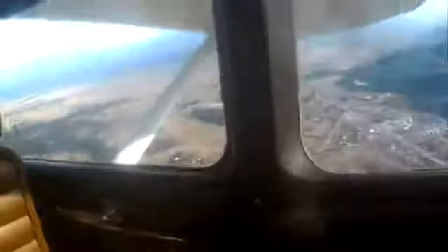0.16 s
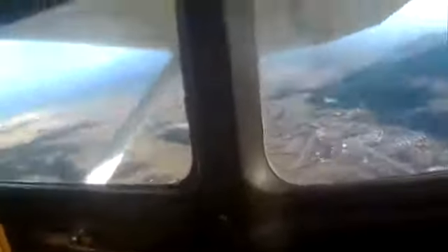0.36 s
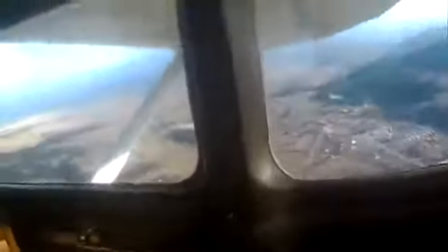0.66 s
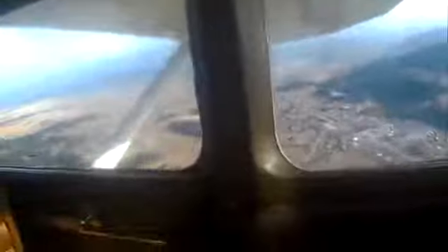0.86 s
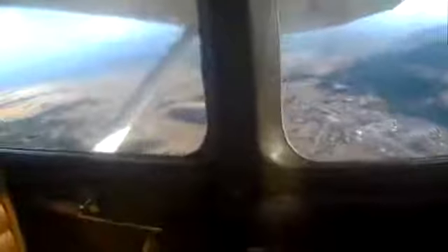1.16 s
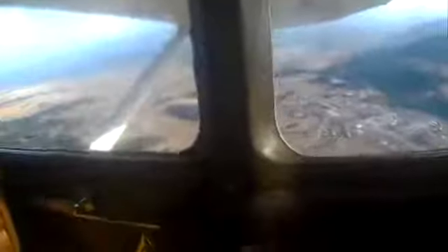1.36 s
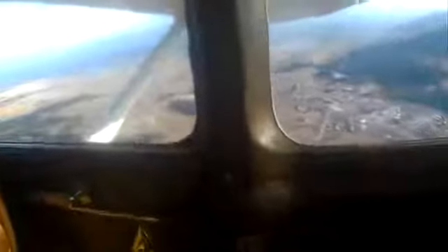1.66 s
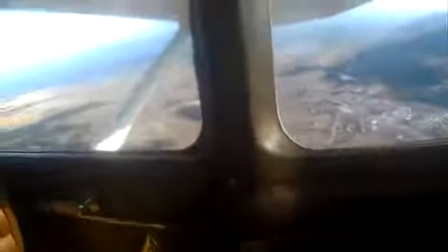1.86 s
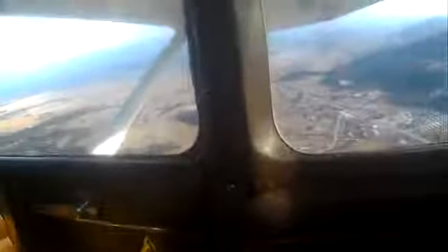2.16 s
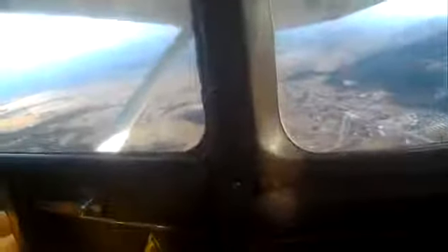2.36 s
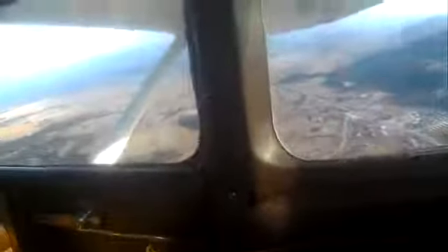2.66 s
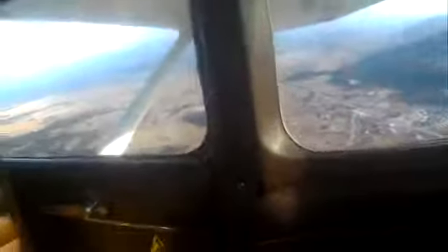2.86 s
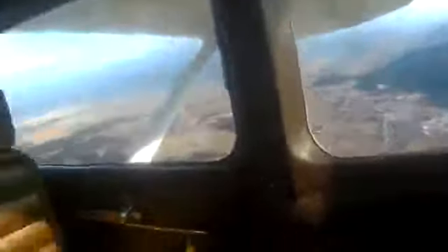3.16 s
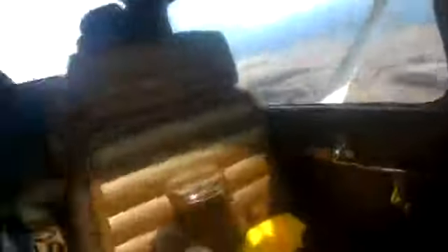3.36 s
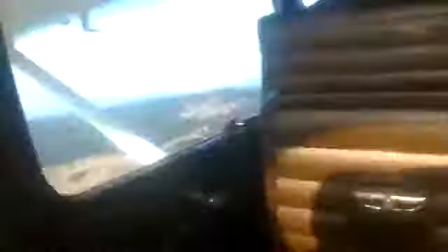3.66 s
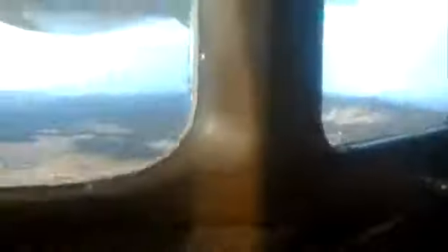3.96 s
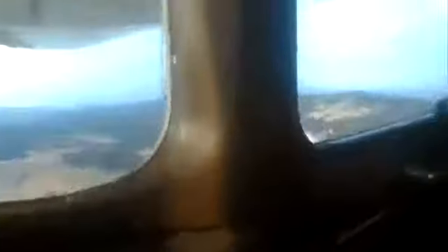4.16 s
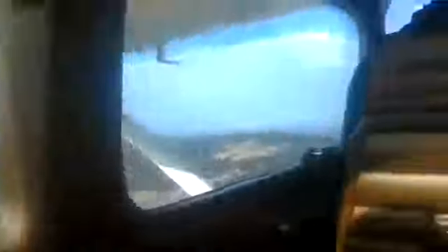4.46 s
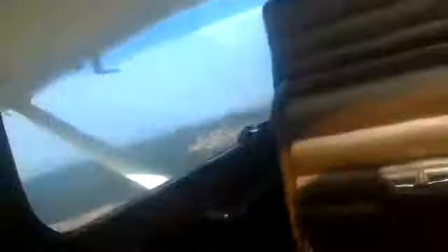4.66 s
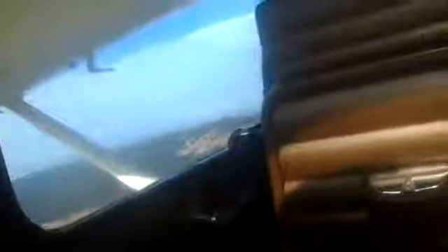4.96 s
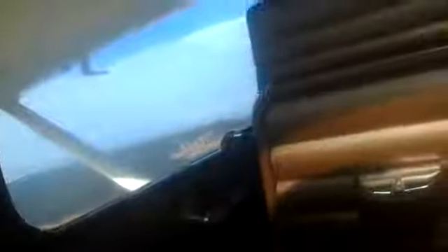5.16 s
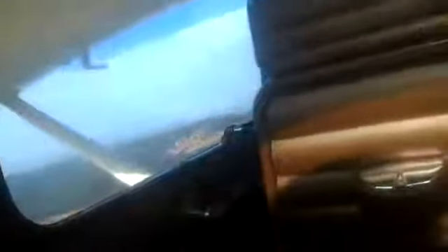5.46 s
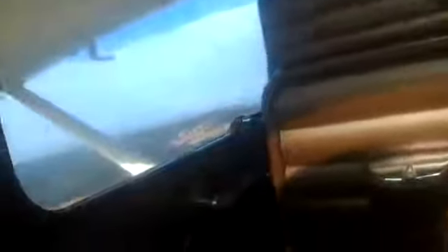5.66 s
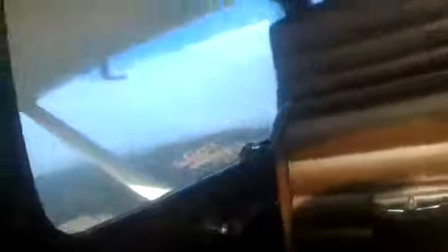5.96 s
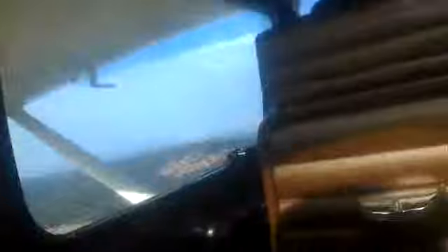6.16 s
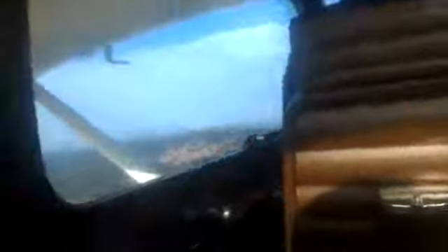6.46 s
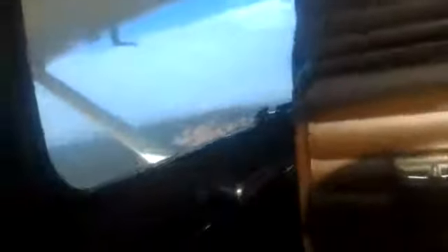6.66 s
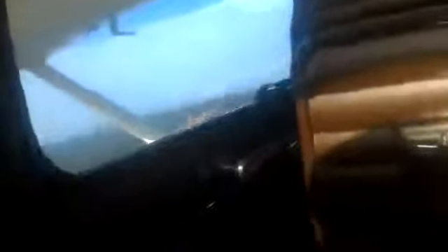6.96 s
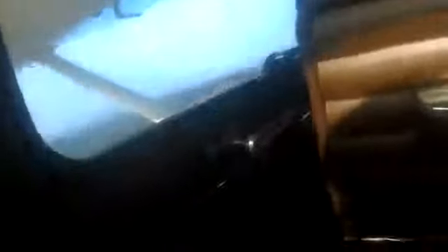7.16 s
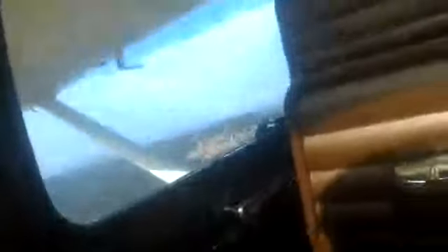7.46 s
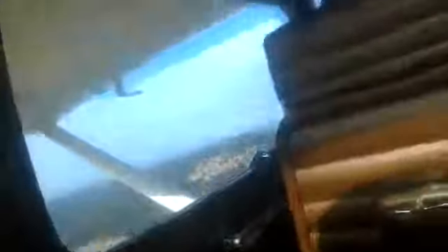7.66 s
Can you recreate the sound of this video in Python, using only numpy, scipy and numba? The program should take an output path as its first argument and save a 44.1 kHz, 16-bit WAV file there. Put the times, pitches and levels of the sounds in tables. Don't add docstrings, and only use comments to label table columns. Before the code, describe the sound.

From the first instant to the cut at about 7.8 seconds, a light propeller airplane cruises, heard inside its cabin through an overloaded handheld microphone. Blades beat about 76 times a second, merging into a rough flutter with a slightly faster exhaust throb, around 114 pulses a second. Panels buzz and slipstream roars, chopped by the beating and clipping. The tone is dry, thin and nasal, deep bass weak, with a bright ringing edge around 1.3 to 3.2 kilohertz and a little hiss above. Tiny casing ticks at the start, 1.5 and 4.5 seconds are almost buried. Between 3.4 and 3.7 seconds the microphone turns to another window; the blade beat grows sharper and brighter, strongest around 3.8 to 4.3. It eases gradually, dullest near 6.9, then sharpens again toward the end. Engine speed stays practically constant, rising imperceptibly.

```python
import sys
import numpy as np
from scipy import signal
from scipy.fft import rfft, irfft
from scipy.io import wavfile
from numba import njit

SR = 44100
rng = np.random.default_rng(int(sys.argv[2]) if len(sys.argv) > 2 else 0)


def volts_from_db(level):
    exponent = np.asarray(level, float) / 20
    return 10 ** exponent


def transcribe(u):
    v = np.clip(np.atleast_2d(u).T, -1, 1)
    q = np.round(v * 32767).astype(np.int16)
    wavfile.write(sys.argv[1], SR, q)


N = 344421

# time in seconds, cycles per second in Hz.
ENGINE_CYCLE = [(0, 19.05), (3.2, 19.045), (4.5, 19.08), (6.2, 19.085), (7.81, 19.115)]
# order of the engine cycle, level at the first window in dB, at the second window in dB.
BLADE_ORDERS = [(4, -1.5, 0), (8, -20, -5.5), (12, -24, -4.5), (16, -32, -16.5)]
# order of the cycle, first window in dB, second window in dB.
EXHAUST_ORDERS = [(1, -32.5, -21.5), (2, -28.5, -30.5), (3, -15, -14.5), (5, -21.5, -25.5), (6, -3, -2.5),
                  (6.87, -17.5, -29), (9, -29.5, -15.5), (11, -34, -20.5), (13, -28, -23.5),
                  (18, -27, -13.5), (22, -28.5, -15.5)]
# order of the cycle, first window in dB, second window in dB.
PANEL_ORDERS = [(14, -23.5, -29.5), (24, -19.5, -25.5), (26, -18, -24.5), (27, -16, -31.5), (28, -18, -17),
                (30, -20.5, -29.5), (32, -24.5, -27), (34, -32.5, -21.5), (36, -22, -30), (37, -28.5, -35),
                (38, -43, -32.5), (42, -26.5, -34.5), (44, -31.5, -25), (62, -31.5, -36)]
# order of the cycle, swing at the first window in dB, at the second window in dB, lag in radians.
WASH_ORDERS = [(1, 0.98, 0.02, 0.89), (3, 0.14, 1, 1.5), (4, 1.24, 0.7, 1.1)]
# frequency in Hz, level in dB per Hz.
ROAR_SPECTRUM = [(20, -2), (50, -2.5), (130, 2), (260, -2.5), (500, -5.5), (800, -10), (1300, -23.5),
                 (2200, -23.5), (3500, -32), (8000, -41.5), (16000, -45)]
# start in seconds, peak level in dB, lowest frequency in Hz.
CASING_TICKS = [
    (0.0014, -47, 4300),
    (1.5254, -46.5, 4300),
    (4.5175, -47, 8800),
]
# frequency in Hz, gain in dB.
PORT_RESPONSE = [(8, -32.5), (30, -23), (60, -22), (150, -19.5), (350, -16), (700, -12.5), (1000, -7.5),
                 (1350, 1.5), (1700, -5), (2050, -2.5), (2450, -5.5), (3000, 4.5), (3250, 1), (3600, -9.5)]
# frequency in Hz, gain in dB.
VOICE_LOWPASS = [(3600, -2), (4400, -5), (5000, -14.5), (5650, -24.5), (6070, -51.5), (6350, -28),
                 (6700, -26.5), (7600, -28.5), (8020, -57), (8350, -32), (8900, -24.5), (10400, -17.5),
                 (12500, -18), (14900, -24.5)]
# time in seconds, gain of the blade overtones in dB.
GLASS_NEARNESS = [(3.4, -3.5), (3.8, 4), (4.3, 3.5), (4.7, 1.5), (5.5, 1), (6.4, -1.5), (6.93, -5.5),
                  (7.2, 0), (7.81, 2)]


def in_time(rows):
    seconds, values = np.transpose(rows)
    return np.interp(np.arange(N) / SR, seconds, values)


def at_hz(points, hz):
    point_hz, db = np.transpose(points)
    return np.interp(np.log(hz + 1), np.log(point_hz), db)


def between(share, first, second):
    return (1 - share) * first + share * second


def drift(rate_hz):
    pole = np.exp(-80 * np.pi * rate_hz / SR)
    noise = rng.standard_normal(N // 40 + 2002)
    slow = signal.lfilter([1], [1, -2 * pole, pole * pole], noise)[2000:]
    return np.interp(np.arange(N) / 40, np.arange(len(slow)), slow / slow.std())


def causal_filter(x, gain_db, size=8192):
    log_gain = np.log(volts_from_db(gain_db(np.fft.rfftfreq(size, 1 / SR))))
    cepstrum = irfft(log_gain)
    cepstrum[1:size // 2] *= 2
    response = irfft(np.exp(rfft(cepstrum[:size // 2 + 1], size)))
    run_in = np.concatenate([x[size:0:-1], x])
    return signal.fftconvolve(run_in, response)[size:size + N]


def orders(table, angle, share, phase, flutter_db, extra_db):
    out = np.zeros(N)
    swell = share * volts_from_db(extra_db)
    for order, first_db, second_db in table:
        second_share = swell if order > 8 else share
        size = (1 - share) * volts_from_db(first_db) + volts_from_db(second_db) * second_share
        flutter = 1 + flutter_db / 8.7 * drift(5.0)
        out += size * flutter * np.cos(round(order) * angle + phase())
    return out


def propeller(angle, share, overtones_db):
    skew = 2.296
    return orders(BLADE_ORDERS, angle, share, lambda: -skew, flutter_db=0.72, extra_db=overtones_db)


def engine(angle, cycle_hz, share, overtones_db):
    lead_s = between(share, 3.664, 2.902) / 1000
    firing_angle = angle + 2 * np.pi * cycle_hz * lead_s
    exhaust = orders(EXHAUST_ORDERS, firing_angle, share, lambda: 0,
                     flutter_db=0.18, extra_db=0.6 * overtones_db)
    panels = orders(PANEL_ORDERS, angle, share, lambda: rng.uniform(0, 2 * np.pi),
                    flutter_db=0.2, extra_db=0.7 * overtones_db)
    return exhaust + panels


def wash(angle, share):
    swing_db = np.zeros(N)
    for order, first_db, second_db, lag in WASH_ORDERS:
        swing_db += between(share, first_db, second_db) * np.cos(round(order) * angle - lag)
    return swing_db


def slipstream(roar_db, treble_db):
    roar = causal_filter(rng.standard_normal(N), lambda hz: at_hz(ROAR_SPECTRUM, hz))
    highpass = signal.butter(1, 6000, "high", fs=SR, output="sos")
    treble = signal.sosfilt(highpass, roar)
    gusts = volts_from_db(roar_db + 0.19 * drift(2.6) + 0.69 * drift(33.0))
    leak = volts_from_db(0.66 * treble_db) - 1
    return gusts * (roar + leak * treble) / roar.std()


def ticks():
    clicks = np.zeros(N)
    t = np.arange(300) / SR
    for start_s, peak_db, low_hz in CASING_TICKS:
        burst = volts_from_db(peak_db + 41.5) * rng.standard_normal(len(t)) * np.exp(-t / 0.0008)
        highpass = signal.butter(4, low_hz, "high", fs=SR, output="sos")
        clicks[round(start_s * SR):][:len(t)] = signal.sosfilt(highpass, burst)
    return clicks


@njit
def sticky_rails(x, leak):
    out, rail, stored = np.empty_like(x), 0., 0.
    for i in range(len(x)):
        stored = leak * stored + rail * x[i] - 1
        if stored < 0:
            rail = np.sign(x[i]) if abs(x[i]) > 1 else 0.
            stored = 0.
        out[i] = rail if rail != 0 else x[i]
    return out


def overloaded_input(pressure):
    recovery_ms, snap_hz = 0.5, 1900
    clipped = np.clip(pressure, -1, 1)
    late = sticky_rails(pressure, np.exp(-1000 / (recovery_ms * SR))) - clipped
    return clipped + signal.sosfilt(signal.butter(2, snap_hz, fs=SR, output="sos"), late)


def turn():
    start_s, length_s = 3.38, 0.33
    x = np.clip((np.arange(N) / SR - start_s) / length_s, 0, 1)
    return x * x * (3 - 2 * x)


def scene():
    cycle_hz = in_time(ENGINE_CYCLE)
    near_db = in_time(GLASS_NEARNESS)
    share = turn()
    angle = 2 * np.pi * np.cumsum(cycle_hz) / SR + 0.0054 * drift(2.3)
    roar_db = -7.5 + wash(angle, share)
    treble_db = between(share, 0.5, 4 + 0.34 * near_db)
    blades = propeller(angle, share, near_db)
    drone = engine(angle, cycle_hz, share, near_db)
    air = slipstream(roar_db, treble_db)
    return (blades + drone + air)[None]


def low_pass(x):
    return signal.sosfilt(signal.butter(12, 14980, fs=SR, output="sos"), x)


def record(dry):
    railed = overloaded_input(dry[0])
    preamp_hiss = volts_from_db(-44.5) * rng.standard_normal(N)
    mix = causal_filter(railed + preamp_hiss + ticks(),
                        lambda hz: at_hz(PORT_RESPONSE, hz) + at_hz(VOICE_LOWPASS, hz))
    return low_pass(mix[None])


dry = scene()
out = record(dry)
transcribe(out)
```